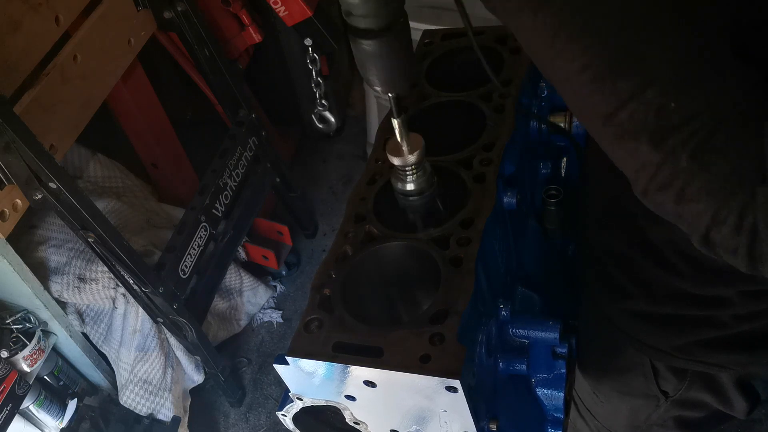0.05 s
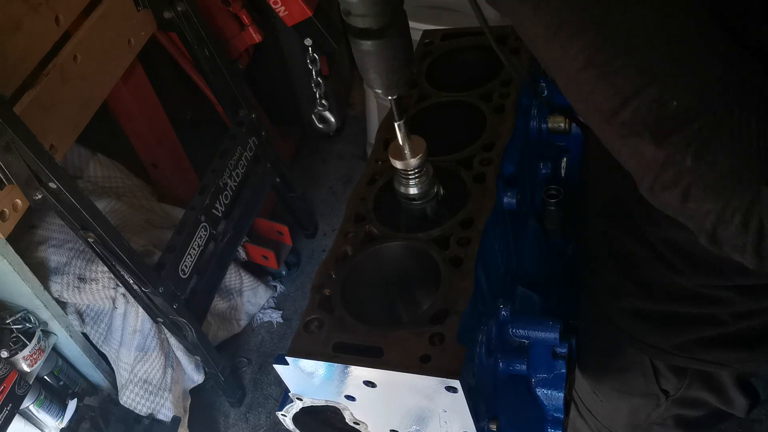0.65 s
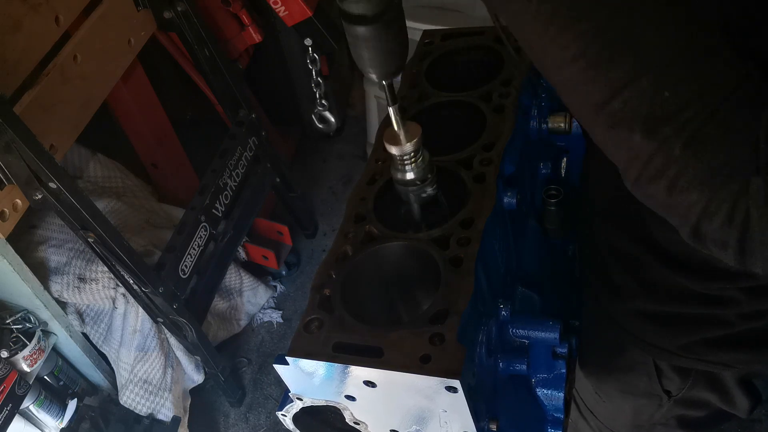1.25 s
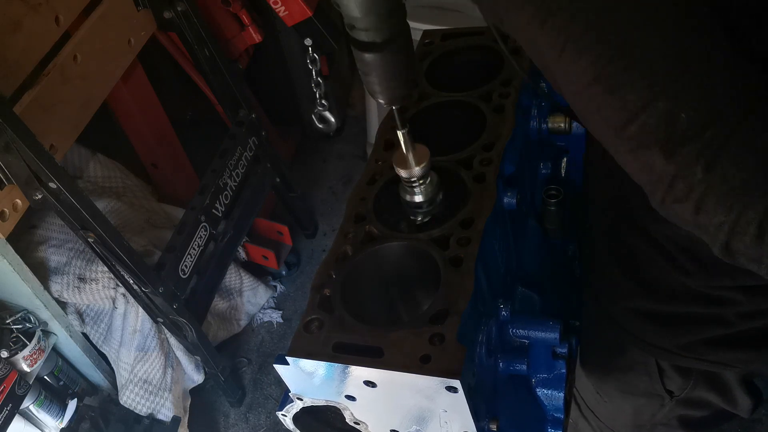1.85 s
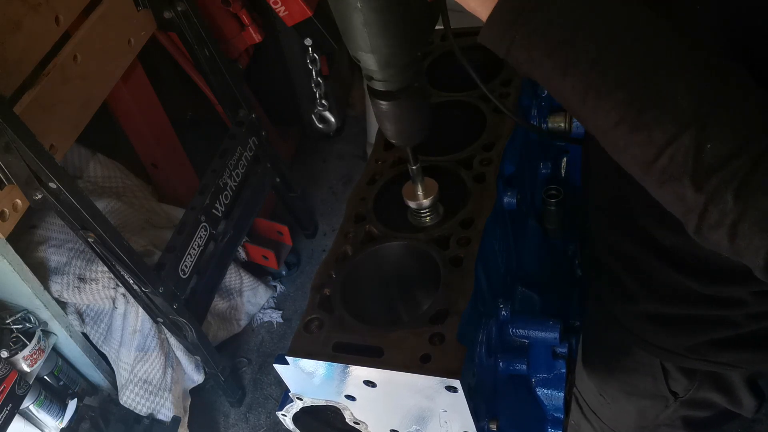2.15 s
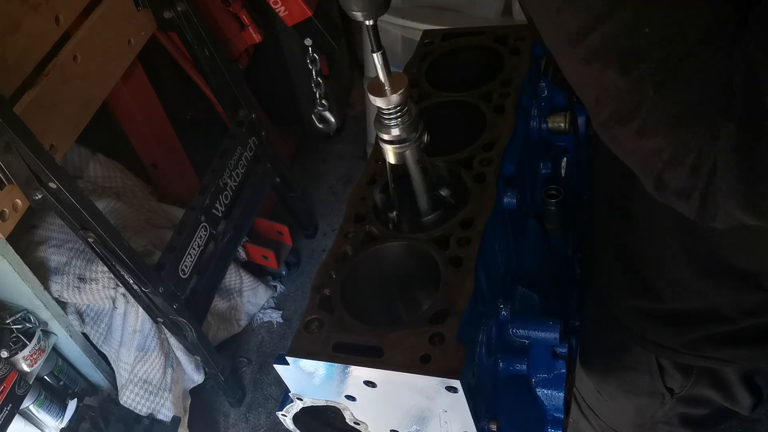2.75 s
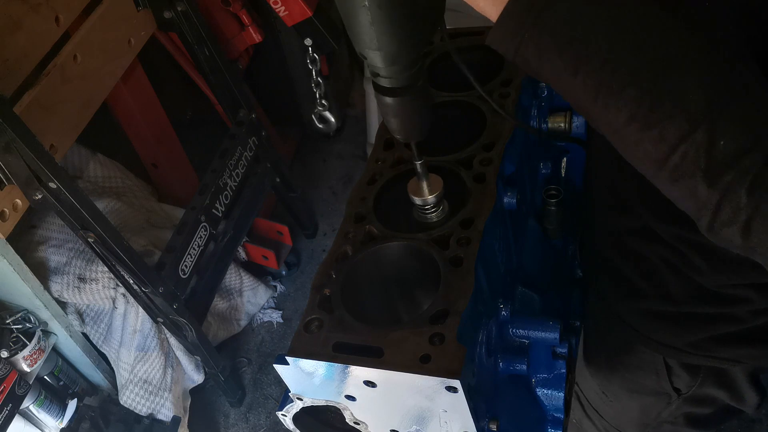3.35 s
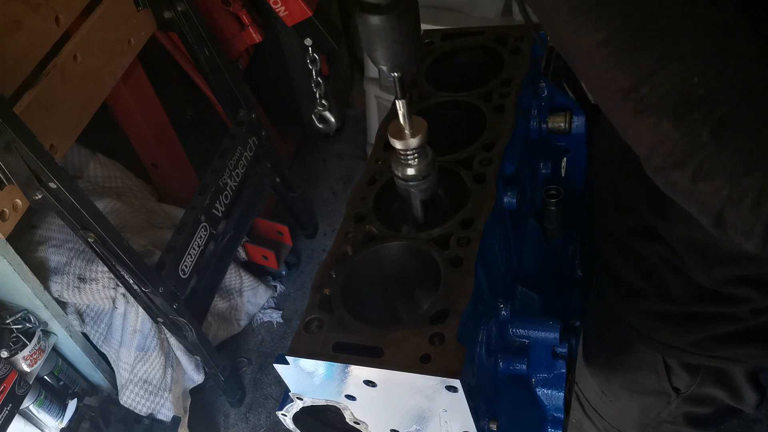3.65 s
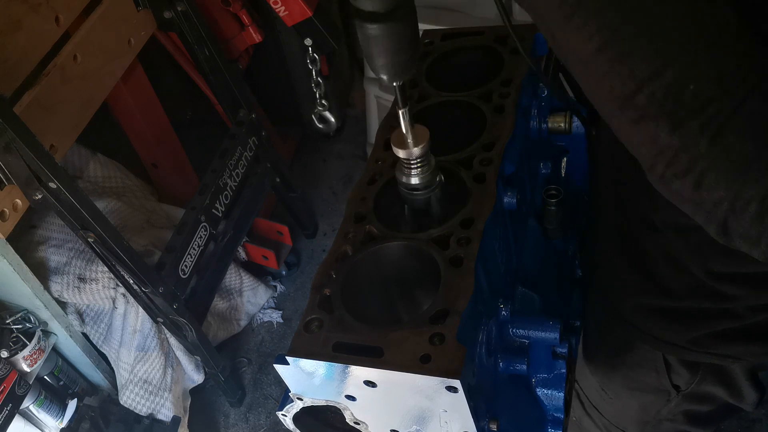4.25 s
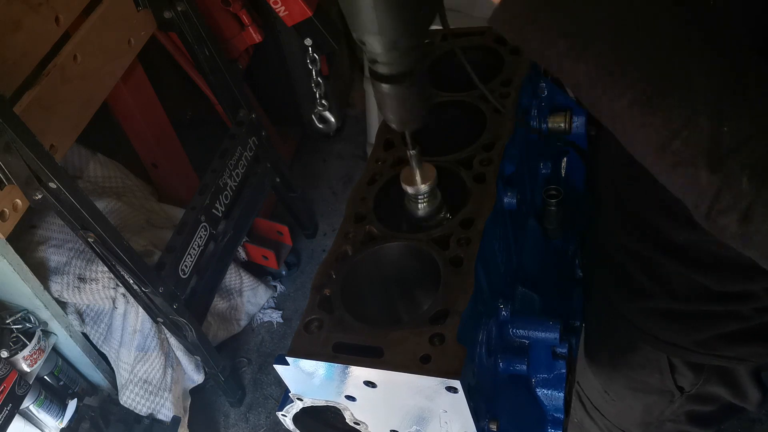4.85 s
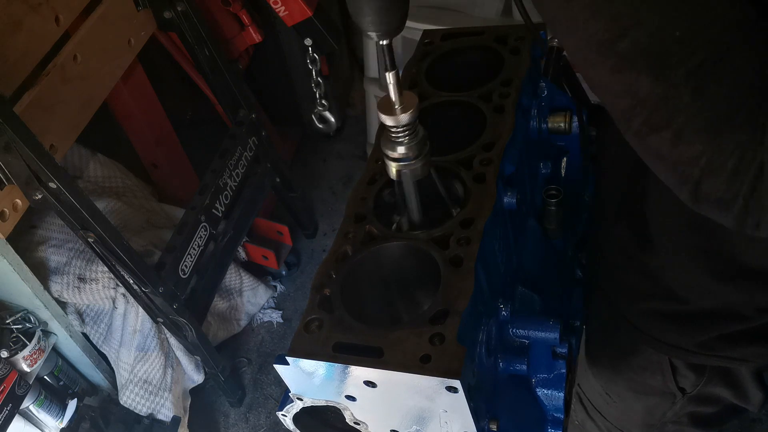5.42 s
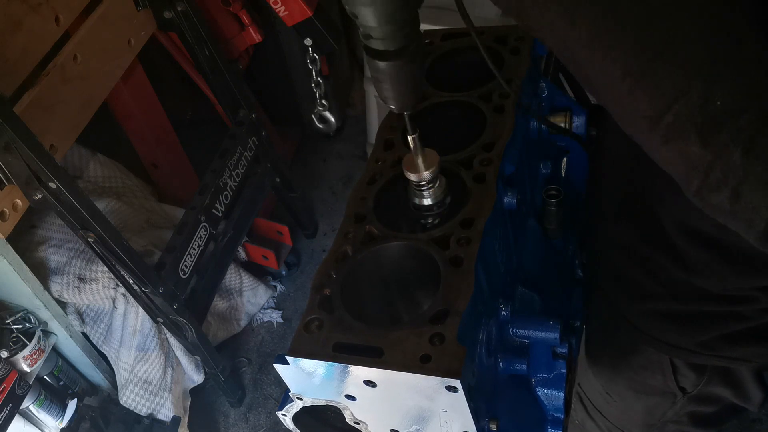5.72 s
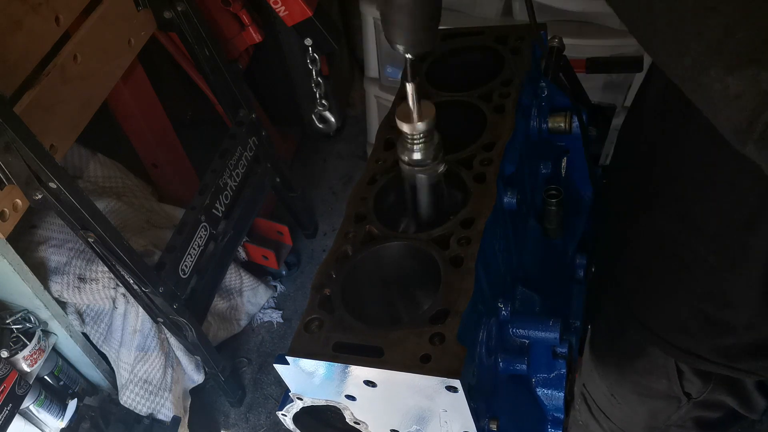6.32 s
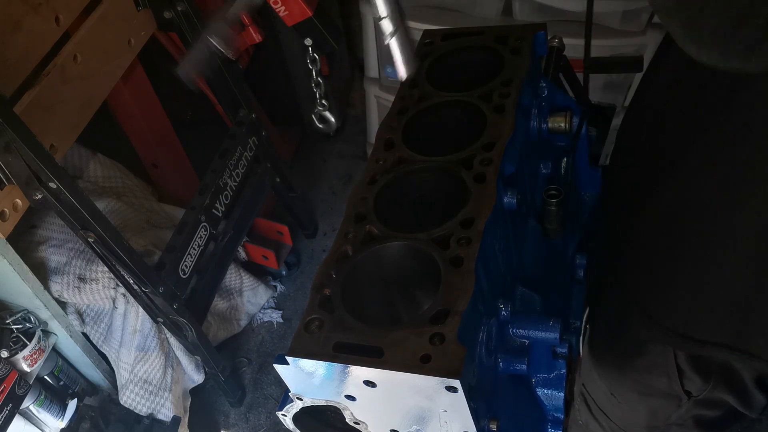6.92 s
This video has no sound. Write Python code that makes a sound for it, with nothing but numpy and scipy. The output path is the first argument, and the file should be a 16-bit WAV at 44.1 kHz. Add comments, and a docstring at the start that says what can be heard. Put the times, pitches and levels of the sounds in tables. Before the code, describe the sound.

Close by in a shed, an electric drill spins a honing tool up and down an oiled engine cylinder. The motor whines and hisses over a gritty rasp of stones on iron, swelling slightly with each stroke. Past the middle the tool knocks and the speed eases a little. Near the end the gears rattle, the drill starts coasting down, and the stones scrape and click out of the bore.

```python
"""A mains drill spins a three-stone hone up and down an oiled iron cylinder bore, close by in a shed.
At first it runs at full drive: the motor whines, its brushes hiss, the gears sing and the stones rasp.
Near 4.8 s the trigger is eased and the hone knocks on the bore. Near 6 s the gears go slack and rattle.
Near 6.5 s the trigger is let go, and the drill coasts down while the sprung stones click out of the bore."""
import sys
import numpy as np
from scipy import signal
from scipy.fft import rfft, irfft, next_fast_len
from scipy.io import wavfile
from scipy.ndimage import map_coordinates

SR = 44100
rng = np.random.default_rng(int(sys.argv[2]) if len(sys.argv) > 2 else 0)


def dump_mix(stems):
    """Bounce the given channels to the path in sys.argv[1] as a 16-bit WAV at rate SR."""
    frames = np.atleast_2d(stems).T  # one column per channel
    limited = np.clip(frames, -1, 1)  # hard clip at full scale
    pcm = np.round(limited * 32767).astype(np.int16)
    wavfile.write(sys.argv[1], SR, pcm)


N = 312228
TIME = np.arange(N) / SR
MAINS_HZ = 50
GEAR_TEETH, SPINDLE_RATIO = 6, 6 / 34  # teeth that meet, and turns of the hone, for each motor turn

# The drill has four stages: full drive, eased, slack gears, coasting. The last three begin at: start_s
STAGE_STARTS = [4.772, 6.055, 6.49]
# Strokes of the hone along the bore: bottom_s, speed_gain_turns_per_s, pull_back_loss_turns_per_s
STROKES = [(-.25, 0, 0), (.954, .86, 1.21), (2.098, 1.28, 1.3), (3.311, 1.33, 1.05), (4.603, 2.67, .66),
           (5.95, 0, 0), (7.4, 0, 0)]


def undb(db):
    """Turn decibels into a gain to multiply by."""
    return 10 ** (np.asarray(db) / 20)


def unit(x):
    """Scale a signal to an average power of 1."""
    return x / np.sqrt(np.mean(x ** 2))


def curve(rows):
    """Join rows of time_s, value with straight lines."""
    return np.interp(TIME, *np.transpose(rows))


def bump(centre_s, half_s):
    """A smooth swell of height 1."""
    return np.exp(-((TIME - centre_s) / half_s) ** 2)


def colour(x, points):
    """Filter a sound by an outline of pitch_hz, gain_db."""
    hz, db = np.transpose(points)
    size = next_fast_len(N + 4096)
    bins_hz = np.maximum(np.arange(size // 2 + 1) * SR / size, 1)
    gain = undb(np.interp(np.log(bins_hz), np.log(hz), db))
    return irfft(rfft(x, size) * gain, size)[..., :N]


def wander(rate):
    """A smooth random drift of about 1 either way, changing rate times a second."""
    coarse_s = TIME[::32]
    drift = map_coordinates(rng.standard_normal(2048), [coarse_s * rate], order=2, mode="wrap")
    return np.interp(TIME, coarse_s, unit(drift))


def waver(depth, rate):
    """A direct path plus shifting reflections makes a tone's level and phase waver."""
    paths = 1 + depth * (wander(rate) + 1j * wander(rate))
    return paths / np.sqrt(np.mean(abs(paths) ** 2))


def grit(spread_db=4, ceiling=2.68):
    """Dense tiny impacts of unequal size."""
    return unit(rng.standard_normal(N) * undb(spread_db * np.minimum(rng.exponential(size=N), ceiling)))


def each_turn(turns, renew_rate, harmonics=150, size=2048):
    """A scratch pattern that repeats every turn and wears into a new one renew_rate times a second."""
    spectra = np.exp(2j * np.pi * rng.random((64, harmonics))) * (np.arange(harmonics) > 0)
    patterns = irfft(spectra, size)
    return unit(map_coordinates(patterns, [TIME * renew_rate, turns % 1 * size], order=1, mode="wrap"))


def stereo(source, shared):
    """A direct part shared by both sides, plus scattered parts that differ left and right."""
    return np.sqrt(shared) * source() + np.sqrt(1 - shared) * np.array([source(), source()])


def step_up(at_s, change_s=0.015):
    """A quick ramp from 0 to 1."""
    return np.clip((TIME - at_s) / change_s + .5, 0, 1)


def staged(values):
    """Hold one value for each of the drill's four stages."""
    return values[0] + sum(change * step_up(s) for s, change in zip(STAGE_STARTS, np.diff(values)))


def easing(recover_s=0.12):
    """Jumps towards 1 as the trigger is eased and dies away as the drive takes hold again."""
    eased_s = STAGE_STARTS[0]
    return step_up(eased_s) * np.exp(-np.maximum(TIME - eased_s, 0) / recover_s)


def halvings(release_s=6.473, coast_s=.94):
    """How many times the speed has halved since the trigger was let go."""
    return np.maximum(TIME - release_s, 0) / coast_s / np.log(2)


def freed():
    """Low while the stones rasp on the bore, rising unevenly to 1 as they slip out."""
    # The stones leave in two steps: time_s, share_of_grip_left
    grip = [(6.65, 0.83), (6.72, 0.39), (6.84, 0.63), (6.89, 0)]
    return 1 - curve(grip)


def stroking(delay):
    """Swings between 1 and -1 with each stroke, peaking delay strokes after the bottom of the bore."""
    stroke = np.interp(TIME, [row[0] for row in STROKES], np.arange(len(STROKES)))
    return np.cos(2 * np.pi * (stroke - delay))


def throb(depth, overtone=0):
    """The motor current peaks twice in each mains cycle; sharp chopping adds an overtone."""
    # How hard the trigger chops the mains, by stage: strength
    chopping = [0.37, 0.055, 0.45, 0.26]
    angle = 2 * np.pi * 2 * MAINS_HZ * TIME
    return unit(1 + depth * staged(chopping) * np.cos(angle) + overtone * np.cos(2 * angle))


def motor_speed(bottom_s=.186, pull_after_s=.291, pull_s=.217):
    """Turns per second: the motor runs light at the bottom of a stroke, sags on the pull, then coasts."""
    # The speed that the trigger asks for: time_s, turns_per_s
    trigger = [(0, 102.98), (.352, 105.42), (.737, 106.62), (2.005, 106.28), (2.665, 107.54),
               (4.337, 106.58), (4.765, 103.6), (4.778, 99.8), (4.86, 99.3), (5.161, 98.13),
               (5.778, 100.91), (6.039, 101.25), (6.069, 100.1), (6.3, 99.45)]
    load = sum(gain * bump(s, bottom_s) - loss * bump(s + pull_after_s, pull_s)
               for s, gain, loss in STROKES)
    return (curve(trigger) + load) * .5 ** halvings()


def mains_hum():
    """A faint, low mains hum that wavers."""
    # Its rise and fall: time_s, level_db
    levels = [(0, -72), (.6, -66), (1.2, -68), (1.5, -82), (1.9, -65), (2.6, -76), (3.5, -65), (3.7, -88),
              (7.08, -75)]
    tone = (waver(0.23, 14) * np.exp(2j * np.pi * MAINS_HZ * TIME)).real
    return np.sqrt(2) * undb(curve(levels)) * tone


def rumble(lift_db=1, free_db=-12.5):
    """The housing and the block shake, more once the gears run slack and less once the stones are out."""
    # The tone of the shaking: pitch_hz, gain_db
    outline = [(20, -4), (45, -5), (80, -10.5), (130, -9), (210, -3.5), (320, 0.5), (480, -0.5), (700, 0),
               (1500, -22.5)]
    # Its strength by stage: base_db
    stage_db = [-55, -59.5, -50.5, -51.5]
    shake = stereo(lambda: rng.standard_normal(N), shared=0.91)
    return unit(colour(shake, outline)) * undb(staged(stage_db) + lift_db + free_db * freed())


def thuds(pitch_hz=255, swell_s=0.024):
    """A low boom of the block swells and dies after each of the two heaviest knocks."""
    # The booms: start_s, level_db
    booms = [(4.775, -53), (6.70, -56)]
    ages = [(np.maximum(TIME - s, 0) / swell_s, db) for s, db in booms]
    swell = sum(undb(db) * age * np.exp(1 - age) for age, db in ages)
    return swell * (waver(0.5, 50) * np.exp(2j * np.pi * pitch_hz * TIME)).real


def rim_scrapes(band_hz=(5800, 13000)):
    """The stones scrape over the rim of the bore in short, bright rasps."""
    # The scrapes: centre_s, half_length_s, level_db
    scrapes = [(4.793, 0.03, -34), (6.688, 0.013, -36), (6.854, 0.037, -31)]
    bright = signal.butter(2, band_hz, "bandpass", fs=SR, output="sos")
    scratch = unit(signal.sosfilt(bright, [grit(), grit()]))
    return scratch * sum(undb(db) * bump(s, half_s) for s, half_s, db in scrapes)


def knocks(crack_s=0.0022, body_s=0.005, body_lift_db=6, favour_db=10.5, favour_width_hz=200, size=6000):
    """The hone hits the bore: a crack, a short ring of its steel arms and a dull clack of the block."""
    # The hits: start_s, steel_peak_db, body_db (against the steel, before the lift), favoured_ring_hz
    hits = [(3.536, -21, -21, 7930), (4.7735, -14, -20, 6560), (4.7995, -18, -12, 6560),
            (6.6907, -16, -17, 7500), (6.8497, -18, -28, 6900), (6.888, -22, -9, 6900),
            (6.932, -24, -2, 6560), (6.952, -23, -9, 6560), (6.9692, -22, -20, 6900),
            (6.99, -23.5, -12, 7500)]
    # How the arms ring: pitch_hz, level_db, fade_s (time to fall 60 dB)
    arm_modes = [(6560, 2.5, 0.038), (6900, 2, .05), (7500, 1, 0.036), (7930, 9, 0.04), (10750, 5, 0.039),
                 (11150, 6, .03), (13300, -8, .03)]
    # How the block rings: pitch_hz, level_db, fade_s
    block_modes = [(855, -2, 0.036), (1250, -21, .03), (1990, 5, 0.046), (2850, 10, .043)]
    out, t = np.zeros((2, N + size)), np.arange(size) / SR
    bright = signal.butter(2, [5500, 12500], "bandpass", fs=SR, output="sos")
    dull = signal.butter(3, [700, 3500], "bandpass", fs=SR, output="sos")
    clack = sum(undb(db - 60 * t / fade_s) * np.sin(2 * np.pi * hz * t) for hz, db, fade_s in block_modes)
    for start_s, steel_db, body_db, favoured_hz in hits:
        ring = np.zeros((2, size))
        for hz, db, fade_s in arm_modes:
            boost_db = favour_db * np.exp(-((hz - favoured_hz) / favour_width_hz) ** 2)
            tone = np.sin(2 * np.pi * (hz * t + rng.random((2, 1))))
            ring += undb(db + boost_db - 60 * t / fade_s) * tone
        crack = signal.sosfilt(bright, rng.standard_normal((2, size)) * np.exp(-t / crack_s))
        steel = ring / abs(ring).max() + 0.59 * crack
        thump = rng.standard_normal((2, size)) * np.exp(-t / body_s)
        body = signal.sosfilt(dull, thump + undb(-14) * clack)
        blow = steel / abs(steel).max() + undb(body_db + body_lift_db) * body / abs(body).max()
        start = int(start_s * SR)
        out[:, start:start + size] += undb(steel_db) * blow
    return out[:, :N]


def brush_whistles(turns, flare_db=2):
    """Thin, rough whistles from the edges of the commutator bars, the contacts that the brushes rub."""
    # Their pitches: cycles_per_turn
    orders = [72, 91, 97, 99, 120, 132]
    # Their strengths against the hiss: base_db
    levels = [-16, -19, -17.5, -24, -14.5, -24]
    # How they weaken, by stage: change_db
    stage_db = [-1.5, -2.5, -3, -1]
    out = np.zeros(N)
    for order, db in zip(orders, levels):
        gain = np.sqrt(2) * undb(db + staged(stage_db) + flare_db * wander(8))
        out += gain * (waver(0.42, 60) * np.exp(2j * np.pi * order * turns)).real
    return out


def brush_hiss(turns, trim_db=-3, ease_db=-3, halving_db=-10.5):
    """Brushes scratch over the same uneven bars on every turn, spark, and blend with the fan's air."""
    # The tone of the hiss: pitch_hz, gain_db
    outline = [(2000, -27.5), (4000, -0.5), (5500, -7.5), (7000, 0.5), (9000, -5.5), (11000, -0.5),
               (13000, -7), (15500, -21.5)]
    # Its strength by stage: base_db
    stage_db = [-27.5, -30.5, -29.2, -27.5]
    scratch = stereo(lambda: grit() + 0.45 * each_turn(turns, 2.5), shared=0.014) + brush_whistles(turns)
    contact = np.exp(0.066 * each_turn(turns, 1.72, harmonics=9))
    pressure = undb(0.5 * wander(18))  # wanders as the drill is pushed and pulled
    hiss = unit(colour(scratch * contact * pressure * throb(.025), outline))
    return hiss * undb(staged(stage_db) + trim_db + ease_db * easing() + halving_db * halvings())


def whines(speed, turns, ease_db=-7.5, halving_db=-4, housing_hz=2511, housing_width_hz=300):
    """Gear teeth and motor parts sing in step with the motor's turning and swell with each stroke."""
    # The pitch of each whine: cycles_per_turn
    orders = [6, 12, 18, 24, 30, 36, 42, 45, 48, 60, 96, 107, 110, 118]
    # The same whines: name, base_db by stage, change_when_free_db, stroke_swell_db, swell_delay_strokes,
    # left_minus_right_db, left_lag_rad, mains_throb_depth, once_a_turn_swing
    voices = [("mesh", (-49.5, -46.5, -65, -75), -9, 1.4, 0.63, 4.4, 0.15, 0.084, 0.21),
              ("mesh 2", (-50, -39.5, -34.5, -34), -20.5, 1, 0.45, 5, 0.81, 0.1, 0.19),
              ("mesh 3", (-42.5, -43.5, -53, -53), -5, 2.4, 0.09, -1, 1, .12, 0.53),
              ("commutator", (-44.5, -42.5, -38, -37.5), -14.5, 1.4, 0.15, -1.3, -0.066, 0.94, 0.52),
              ("mesh 5", (-47.5, -54, -48, -47), -6, 0.77, 0.31, 0, 0.5, .1, 0.52),
              ("slots", (-44.5, -38, -50, -44.5), -9, 2.3, 0.81, -1.94, 0.14, .052, 0.2),
              ("mesh 7", (-48, -52, -61, -56), -1, 0.73, 0.59, 1, 0.35, .1, 0.47),
              ("thin whistle", (-48, -63, -62, -56), 0, 1, 0.8, 1, 0.28, .1, 0.27),
              ("commutator 2", (-43.5, -41, -34.5, -37), -4.5, 1.9, 0.74, 4.7, 0.43, .06, 0.57),
              ("slot whistle", (-43, -47, -49, -59), -15, 0.4, 0.065, 0, -0.28, 0.11, 0.88),
              ("commutator 4", (-66, -62, -43.5, -43), 1, .5, 0.78, 0, 0.2, .06, .3),
              ("eased whistle", (-58, -53, -64, -68), -4, .5, .5, -3, 0, .06, .5),
              ("slack whistle", (-66, -63, -44, -58), -4, .5, .5, -9, 0, .06, .3),
              ("coasting whistle", (-66, -70, -47, -50), -5, .5, .5, -6, 0, .06, .5)]
    # A whine flares or fades for a moment: centre_s, name, half_length_s, change_db
    flares = [(.05, "commutator 2", .07, 5), (0.132, "commutator", 0.19, 3.5),
              (0.105, "slot whistle", 0.11, 6), (.12, "mesh 7", 0.25, 8.5), (0.208, "mesh", 0.13, -13),
              (0.413, "mesh 2", 0.47, 8), (.36, "commutator 2", 0.12, 6.5), (.59, "slot whistle", .05, -15),
              (0.59, "commutator 2", 0.04, -2), (.73, "commutator 2", 0.057, 6.5),
              (.95, "commutator 2", 0.15, -1), (.95, "slot whistle", 0.15, 8.5),
              (1.005, "commutator", 0.051, 3), (1.002, "mesh 3", .1, 3), (1.12, "commutator", 0.024, -9),
              (1.21, "mesh 3", .06, -8), (1.24, "commutator", 0.091, 3), (1.27, "slot whistle", 0.16, 4),
              (1.68, "slot whistle", 0.063, 2), (1.7, "commutator", 0.26, 0),
              (2.062, "commutator", 0.036, -12), (2.16, "slot whistle", 0.14, 9.5),
              (2.16, "mesh 2", 0.1, 11), (2.145, "mesh 3", 0.092, 7), (2.198, "commutator", 0.042, 2),
              (2.278, "commutator 2", .05, -13), (2.63, "commutator 2", 0.074, 9),
              (2.78, "slot whistle", 0.033, -2), (2.36, "commutator", 0.11, -4.5),
              (2.8, "commutator", 0.18, 5), (3.15, "commutator", 0.18, 6),
              (3.068, "slot whistle", 0.035, 8.5), (3.166, "slot whistle", 0.035, -14),
              (3.282, "mesh 2", 0.32, 14.5), (3.288, "commutator 2", .04, -9), (3.35, "mesh 3", 0.13, 6),
              (3.416, "commutator 2", 0.055, 7), (3.433, "slot whistle", 0.18, 5),
              (3.484, "commutator", 0.027, 10), (3.6, "commutator", 0.073, -16),
              (3.9, "commutator 2", 0.056, -7), (4.08, "commutator", 0.38, 5),
              (4.27, "commutator 2", 0.057, -7), (4.38, "slot whistle", 0.056, 8),
              (4.505, "commutator", 0.1, -6), (4.57, "commutator 2", 0.098, -4),
              (4.58, "mesh 2", 0.099, 14), (4.614, "slot whistle", 0.12, 7),
              (4.754, "commutator", 0.016, 8), (4.757, "mesh 3", 0.011, 11), (4.87, "commutator 2", .07, 0),
              (5.051, "mesh 3", 0.22, 6), (5.167, "commutator 2", 0.12, 5), (5.211, "commutator", 0.1, 4),
              (5.23, "slot whistle", 0.065, -15), (5.433, "mesh 3", .05, 11),
              (5.45, "commutator 2", .06, 1), (5.576, "mesh 3", 0.047, -9),
              (5.602, "commutator 2", 0.062, -7), (5.726, "mesh 3", .07, 6.5),
              (5.87, "commutator 2", .13, 4), (6.27, "commutator", 0.066, 1.5),
              (6.35, "slot whistle", .15, 3), (6.512, "coasting whistle", .04, 5), (6.49, "mesh 2", .05, 2),
              (6.655, "mesh 2", 0.024, 5), (6.668, "commutator 2", 0.024, -11),
              (6.8, "commutator 4", .14, -11), (6.86, "commutator 2", 0.022, -14),
              (6.754, "mesh 2", .04, 3), (7.0, "mesh 2", .08, -8)]
    # Reflections briefly put left and right out of step: centre_s, name, half_length_s, extra_lag_rad
    phase_shifts = [(6.32, "commutator 2", 0.088, 1.3), (6.2, "commutator", 0.088, 1.1),
                    (6.5, "commutator", 0.11, .8)]
    # The overtone from sharp mains chopping, by stage: depth
    chop_overtone = [0.015, 0.05, 0.25, 0.16]
    stutter_db = staged([0.57, 0.61, 0.6, 1.9])  # from rattling parts
    flutter_depth = staged([0.2, 0.18, .15, 0.44])  # from shifting reflections
    drive_db = ease_db * easing() + halving_db * halvings()
    out, free = np.zeros((2, N)), freed()
    for order, voice in zip(orders, voices):
        name, stage_db, free_db, stroke_db, delay, pan_db, lag, throb_depth, swing = voice
        pitch_hz = order * speed
        db = staged(stage_db) + drive_db + free_db * free + stroke_db * stroking(delay)
        # the housing rings along with any whine near its own pitch
        db += 9.5 / (1 + (2 * (pitch_hz - housing_hz) / housing_width_hz) ** 2)
        db += sum(flare_db * bump(s, half_s) for s, which, half_s, flare_db in flares if which == name)
        db += 0.8 * wander(8) + stutter_db * wander(37)
        # the rotor runs slightly off centre, which adds a tone one cycle per turn lower
        once_a_turn = np.exp(-2j * np.pi * (turns + rng.random()))
        off_centre = 1 + swing * once_a_turn * (1 + 0.46 * wander(5.3)) / 2
        tone = np.exp(2j * np.pi * (order * turns + rng.random()))
        tone *= undb(db) * throb(throb_depth, staged(chop_overtone)) * off_centre
        lag += sum(rad * bump(s, half_s) for s, which, half_s, rad in phase_shifts if which == name)
        left, right = unit(undb(np.array([pan_db, -pan_db]) / 2))
        sides = left * np.exp(-1j * lag), right
        flutter = flutter_depth * np.sqrt(pitch_hz / 2520)  # higher whines waver more
        out += np.sqrt(2) * np.array([(tone * side * waver(flutter, 36)).real for side in sides])
    return out


def stone_bites(turns, catch_db=2):
    """Coarse grains catch under the stones in quick uneven spurts, harder once per turn of the hone."""
    # The bites, mostly at the top of a stroke: centre_s, half_length_s, level_db
    bites = [(0.518, 0.18, -33.5), (1.57, .06, -32), (2.392, 0.054, -36), (2.91, .1, -31.5),
             (4.08, 0.13, -33.5), (4.734, 0.055, -31), (5.302, .12, -42), (6.58, 0.042, -36)]
    # The tone of the grinding: pitch_hz, gain_db
    outline = [(1200, -26.5), (2300, 0), (2800, -0.5), (3400, -2), (4000, -10.5), (5500, -24), (9000, -34)]
    pressure = undb(catch_db * wander(90)) * (1 + 0.26 * np.cos(2 * np.pi * SPINDLE_RATIO * turns))
    grains = stereo(lambda: grit(spread_db=6, ceiling=3), shared=0.25)
    grinding = unit(colour(grains * pressure, outline))
    return grinding * sum(undb(db) * bump(s, half_s) for s, half_s, db in bites)


def stone_rasp(turns, grab_db=0.81, mouth_swell_db=1, chatter_swell_db=-0.06, ease_db=-5, free_db=-10):
    """Grit scrapes the bore, harder once per turn of the hone; the gear teeth chop it and add a buzz."""
    # The tone of the rasp: pitch_hz, gain_db
    outline = [(300, -33), (600, -11), (800, -9.5), (1000, -4.5), (1300, -2.5), (1700, -1), (2200, -1),
               (2800, 1), (3400, 0.5), (4200, -11), (5200, -12), (7000, -27), (15000, -40)]
    # Its strength by stage: base_db
    stage_db = [-28.5, -30, -28.5, -30.5]
    # The part that escapes through the mouth of the bore: pitch_hz, gain_db
    mouth_outline = [(1700, -8), (2700, -16), (3300, -11), (4200, -12), (6000, -29)]
    # The part where the gearbox chatters: pitch_hz, gain_db
    chatter_outline = [(500, -18), (900, 1.5), (1500, 4.5), (2400, -26)]
    # How much it chatters, by stage: boost_db
    chatter_db = [0.85, -0.011, 2.3, 1.1]
    scrape = stereo(lambda: grit() + 0.44 * each_turn(turns, 2.18), shared=0.33)
    grab = undb(grab_db * wander(35))  # the stones grab and let go where the oil film is uneven
    pressure = (1 + 0.034 * np.cos(2 * np.pi * SPINDLE_RATIO * turns)) * grab
    teeth = 1 + 0.26 * np.cos(2 * np.pi * GEAR_TEETH * turns)
    rasp = unit(colour(scrape * pressure * teeth * throb(0.022), outline))
    mouth_gain = undb(mouth_swell_db * stroking(delay=0.66))  # louder near the mouth
    rasp += (mouth_gain - 1) * colour(rasp, mouth_outline)
    chatter_gain = undb(staged(chatter_db) + chatter_swell_db * stroking(delay=0))
    rasp += (chatter_gain - 1) * colour(rasp, chatter_outline)
    return rasp * undb(staged(stage_db) + ease_db * easing() + free_db * freed())


def scene():
    """The motor's turning drives the whines, rasp and hiss; rumble, knocks and hum join them."""
    # How unsteady the motor is, by stage: share_of_speed
    jitter = [0.00099, 0.00095, 0.0011, 0.00553]
    # How the drill faces the microphones, by stage: left_minus_right_db
    facing_db = [0.4, -3, 0.9, 0.8]
    speed = motor_speed()
    turns = np.cumsum(speed * (1 + staged(jitter) * wander(70))) / SR
    hum = mains_hum()
    facing = undb(np.array([[1], [-1]]) * staged(facing_db) / 2)
    drill = whines(speed, turns) + stone_rasp(turns) + stone_bites(turns) + brush_hiss(turns)
    return facing * drill + rumble() + rim_scrapes() + knocks() + thuds() + hum


def record(dry):
    """Two microphone openings colour the treble; the left hears slightly later, and the top is cut."""
    # The treble resonance of each opening: pitch_hz, gain_db
    left_port = [(3000, 0), (4800, 3.5), (5600, 6), (6300, 7), (7000, 7.5), (7700, 7), (8300, 1), (9000, 0),
                 (9500, -10), (9900, -25), (13000, -13.5), (15500, -4)]
    right_port = [(3000, 0), (4800, 4), (5700, 0.5), (6600, -6), (7900, -9), (8800, 0.5), (9400, 2.5),
                  (9800, 7.5), (10500, 10), (11300, 7), (11900, 2), (12800, 5), (14200, 3.5), (15500, -5)]
    lag_samples, top_hz = 2, 15600
    left = colour(np.pad(dry[0], (lag_samples, 0))[:N], left_port)
    right = colour(dry[1], right_port)
    top_cut = signal.ellip(10, .2, 80, top_hz, fs=SR, output="sos")
    return signal.sosfilt(top_cut, np.array([left, right]))


dry = scene()
out = record(dry)
dump_mix(out)
```